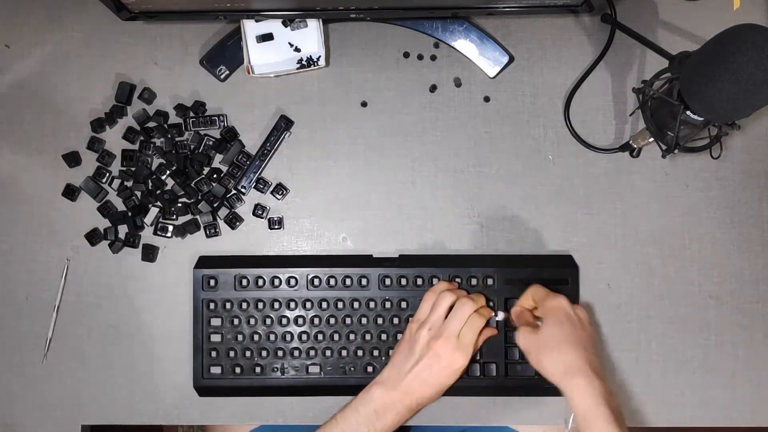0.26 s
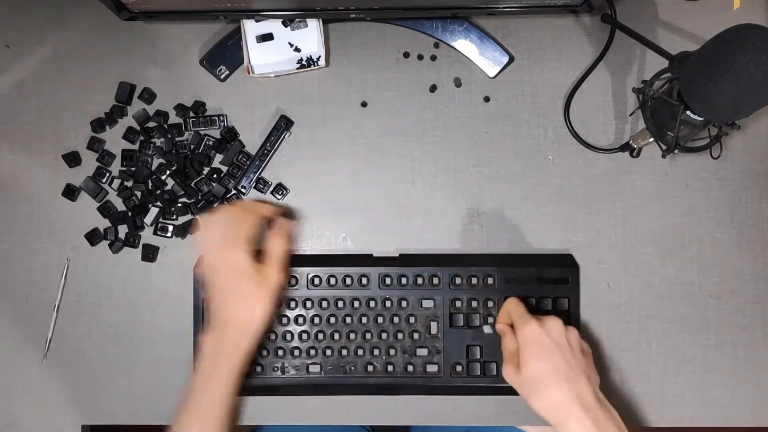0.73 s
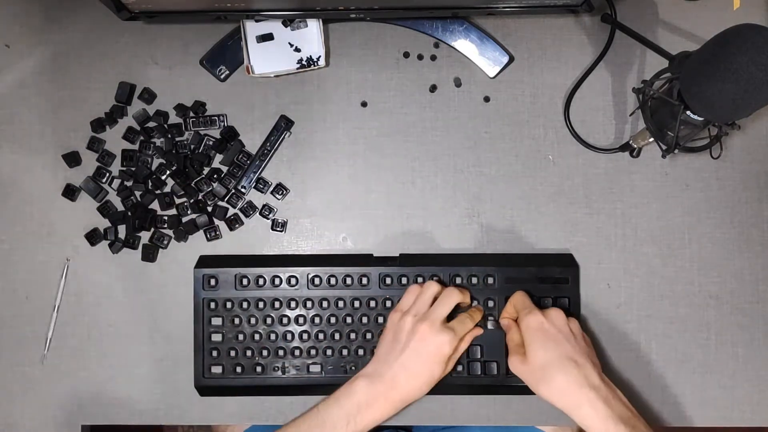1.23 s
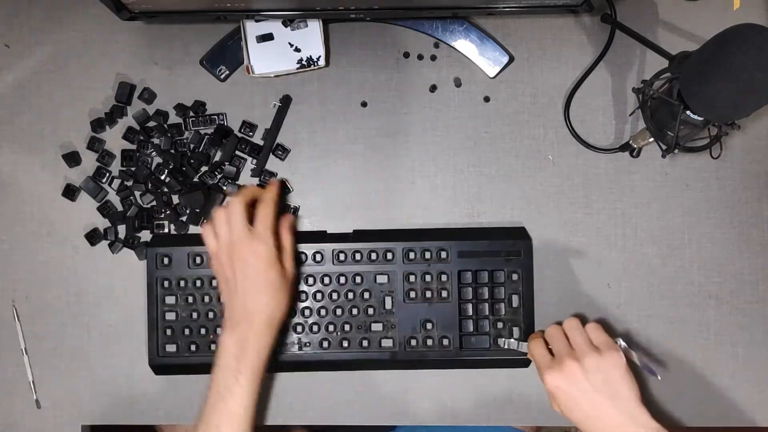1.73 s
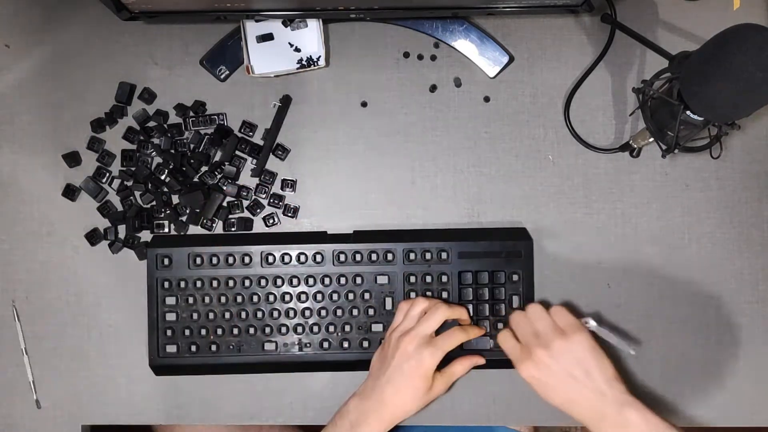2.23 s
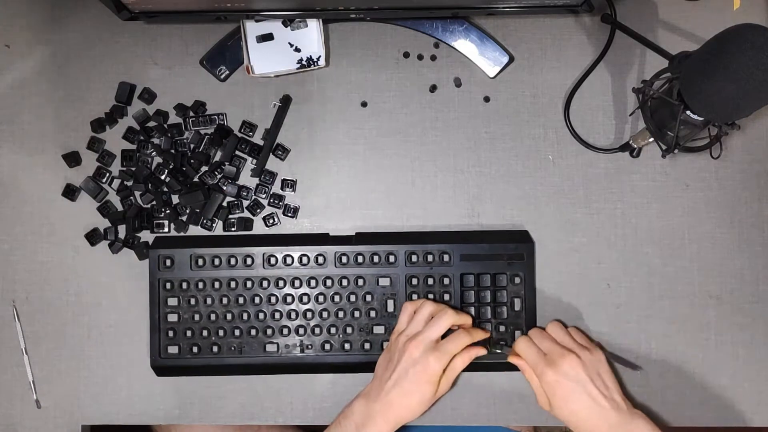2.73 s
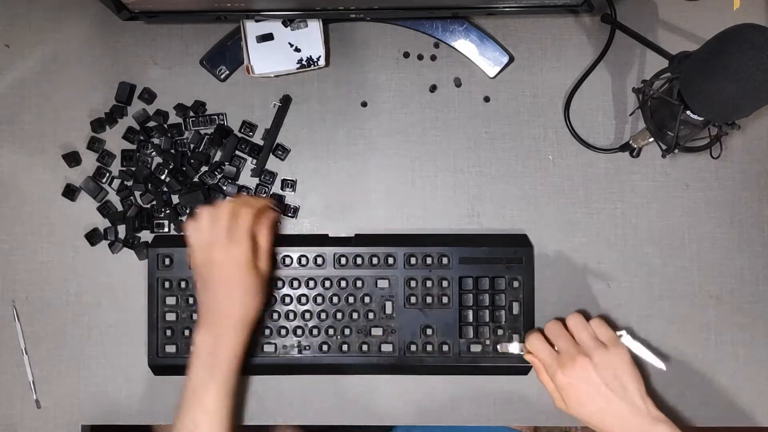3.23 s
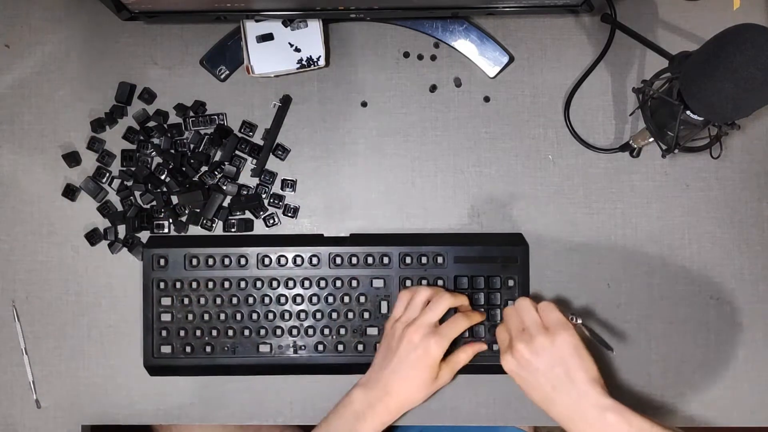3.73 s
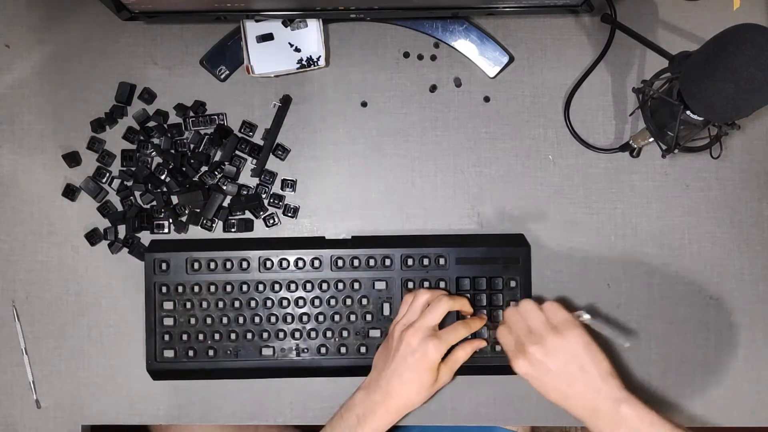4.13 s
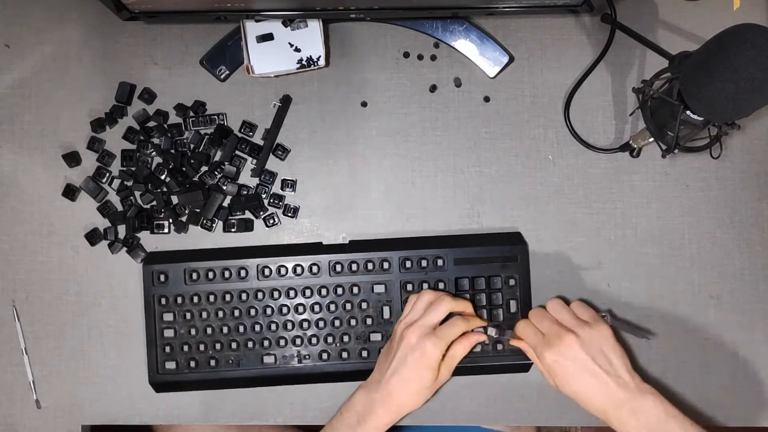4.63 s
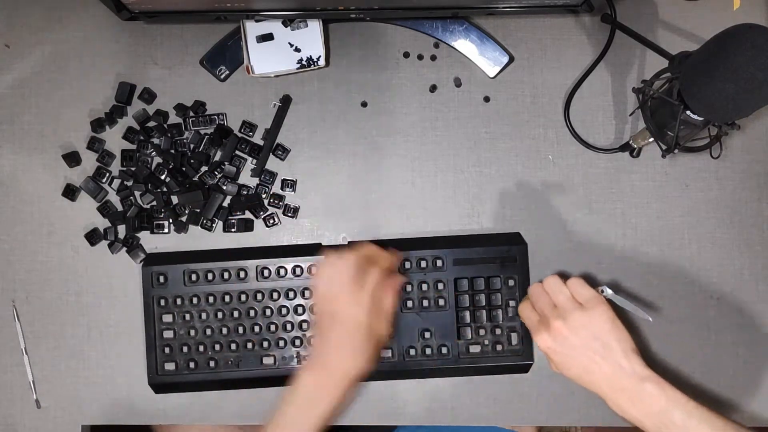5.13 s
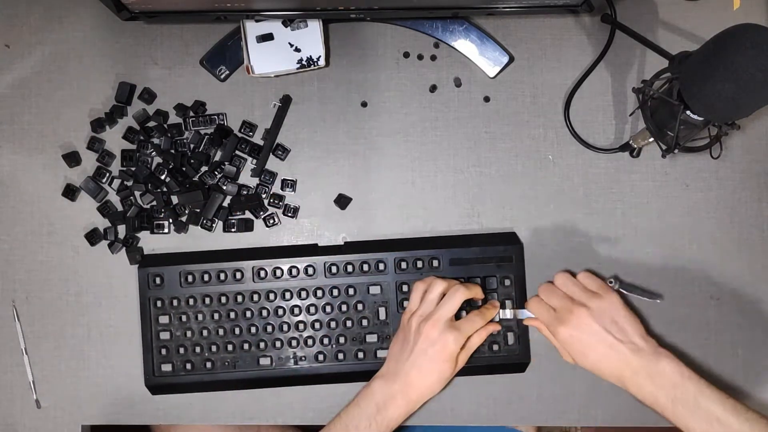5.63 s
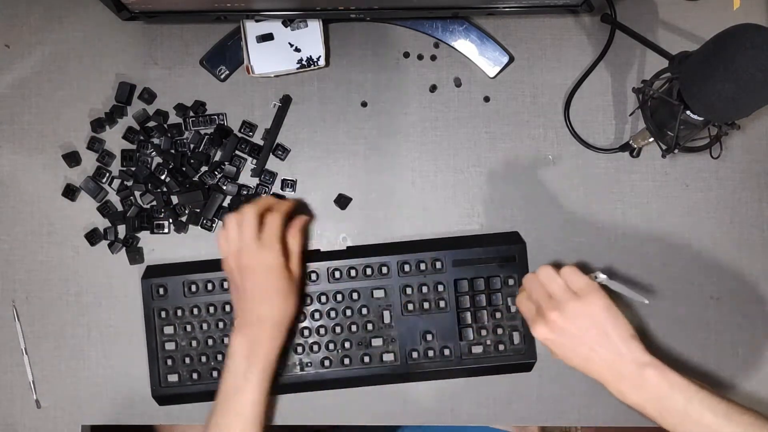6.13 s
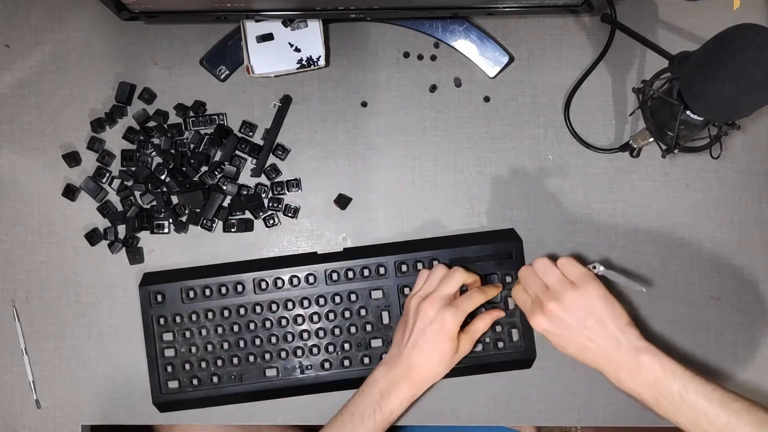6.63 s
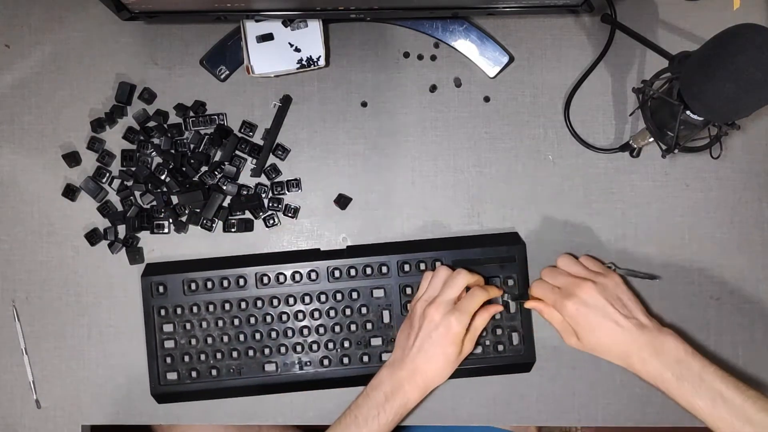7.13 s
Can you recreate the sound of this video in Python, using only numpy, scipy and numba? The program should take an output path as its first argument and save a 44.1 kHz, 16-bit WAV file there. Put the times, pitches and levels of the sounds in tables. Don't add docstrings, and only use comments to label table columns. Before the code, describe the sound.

Close overhead stereo capture in a small room: a tool levers keycaps off a keyboard with dry, stuttering plastic clicks and sharp snaps. Between pulls, caps clatter onto a heap in short bright bursts of ticks. Fingers scuff the case, soft low thumps go through the desk, and a brief bright echo follows over very faint hiss.

```python
import sys
import numpy as np
from scipy import signal
from scipy.fft import rfft, irfft, next_fast_len
from scipy.io import wavfile
from scipy.ndimage import uniform_filter1d
from numba import njit

SR = 44100
rng = np.random.default_rng(int(sys.argv[2]) if len(sys.argv) > 2 else 0)


def volts_from_db(level):
    exponent = np.asarray(level, float) / 20
    return 10 ** exponent


def dump(signal):
    limited = np.clip(np.atleast_2d(signal).T, -1, 1)
    pcm = np.round(limited * 32767).astype(np.int16)
    wavfile.write(sys.argv[1], SR, pcm)


N = 325017
M = next_fast_len(N)

# f/Hz, level/dB, t60/s
CASE_MODES = [(1100, 3.5, 0.016), (1370, -5, 0.084), (1510, 10.5, 0.0075), (1780, -3.5, 0.024),
              (2060, 12, 0.0085), (2260, -9.5, 0.004), (2525, 16.5, 0.0046)]
# f/Hz, level/dB, t60/s
CAP_WALL_MODES = [(3024, -22, 0.017), (3160, 15, 0.0022), (3590, 5.5, 0.028), (4246, 12.5, 0.0071),
                  (5054, 10, 0.012)]
# f/Hz, level/dB, t60/s
CAP_SHELL_MODES = [(5550, 5, 0.0085), (6536, 9, 0.012), (7360, 6.5, 0.022), (7890, 13, 0.0073),
                   (9680, 10, 0.0036), (9960, 1, 0.028), (12600, -22, 0.0015), (11530, 11, 0.0052),
                   (15200, 6.5, 0.0036)]
# f/Hz, level/dB, t60/s
BOARD_MODES = [(335, -7.5, 0.006), (505, -15.5, 0.25), (504, -4.5, 0.06), (677, 0.5, 0.046),
               (742, 0.5, 0.02), (900, -15.5, 0.0083)]
# f/Hz, level/dB, t60/s
DESK_LOW_MODES = [(29.2, -13.5, 0.6), (45.55, -14, 0.93), (67.1, -13, 0.44), (99.7, -2, 0.58),
                  (124.3, -5, 0.26), (162.7, -5.5, 0.24), (192, -10.5, 0.23)]
# f/Hz, level/dB, t60/s
DESK_TOP_MODES = [(251, -10.5, 0.069), (271.2, 0, 0.16), (291, -7.5, 0.13), (377, -18, 0.027),
                  (461, -8, 0.09), (540, -7.5, 0.059)]
# f/Hz, t60/s
ROOM_DECAY = [(100, 1), (400, 0.43), (1100, 0.3), (3000, 0.3), (7700, 0.26), (14000, 0.21)]
# f/Hz, level/dB
HISS_COLOUR = [(180, -36.5), (300, -42), (448, -14), (560, -1), (823, -19), (4700, -11), (7630, -6),
               (13800, -13)]
# f/Hz, left minus right/dB
PORT_BALANCE = [(100, 0), (1000, -0.5), (2500, 0), (5000, -1.5), (8000, -7), (12000, 6.5)]
# f/Hz, likeness/0-1
PORT_LIKENESS = [(30, .95), (95, 1), (160, 0.52), (290, 0.88), (640, 0.42), (1400, 0.04), (3100, 0.24),
                 (7000, 0)]
# mean delay t/s, level/dB
REBOUNDS = [
    (0, -3.5),
    (.002, 1),
    (.006, -6),
    (.011, -7),
    (.018, -13),
]
# t/s, peak level/dB, upper desk modes/dB, push length/s
PUSHES = [(0.108, -21, -30, 0.014), (0.342, -19.5, -25, 0.025), (0.63, -23, -43, 0.029),
          (1.318, -21, -31, 0.0058), (1.586, -24.5, -35, 0.012), (1.666, -24.5, -32, 0.023),
          (2.021, -47, -6, 0.0069), (2.154, -24.5, -14.5, 0.012), (2.391, -28, -15, 0.025),
          (2.616, -16, -13, 0.029), (2.799, -16, -19.5, 0.012), (3.031, -16.5, -15, 0.084),
          (3.843, -15, -16.5, 0.016), (3.901, -13.5, -21.5, 0.018), (4.06, -29.5, -9, 0.0099),
          (3.854, -34.5, -1, .006), (4.271, -31, -22, 0.011), (4.451, -36, -19, 0.023),
          (4.606, -26, -10, 0.0034), (4.778, -36.5, -7, 0.0051), (5.339, -26.5, -19, 0.01),
          (5.466, -46, 4.5, 0.0045), (5.784, -37, 0.5, 0.0054), (6.382, -23.5, -15, 0.029),
          (6.582, -33.5, -16.5, 0.0054), (6.782, -26, -19, 0.0047), (7.084, -31, -42, 0.01),
          (7.251, -23.5, -17.5, 0.067)]
# t/s, case peak level/dB, cap shell/dB, knock/dB, own ring f/Hz
SNAPS = [(0.3377, -17.5, 7.5, -32, 1500), (2.0005, -17, -1, -13, 2037), (2.803, -11.5, 4, -15.5, 1730),
         (3.9094, -18.5, -28, -15, 1830), (5.2176, -19, 11, -13, 3860), (5.3091, -22, -26, -25, 1120),
         (5.3715, -25, 1, -31, 4580), (5.5213, -24, 3, -34, 1780), (5.6759, -12.5, 1, -40, 2170),
         (5.9879, -34, -5, -14, 2260), (7.3231, -14.5, 1.5, -42, 3900)]
# t/s, case peak level/dB, cap shell/dB, knock/dB, own ring f/Hz
PRIES = [(0.0808, -33, -5, -14, 1510), (0.0943, -14, -7, -11, 1760), (0.1822, -21, -4.5, -13.5, 1520),
         (0.2106, -24.5, -24, -23, 1080), (0.3304, -17, -6.5, -15.5, 1470), (0.5872, -28, -5.5, -22, 1660),
         (1.3188, -19, 0, -8.5, 1390), (2.141, -23, -15.5, -17.5, 3080), (2.6086, -28, -7, -12, 1750),
         (2.6119, -18, -2, -11, 1470), (3.018, -25, -9, -4, 1510), (3.7795, -35.5, 17, -28, 2600),
         (4.005, -23, -3.5, -20, 4600), (4.0498, -20, 3.5, -17, 2000), (4.281, -23.5, -3.5, -30, 1050),
         (4.4652, -27.5, 2, -44, 1370), (4.5996, -14.5, 5, -12, 1750), (4.9892, -17.5, 5, -10, 2260),
         (5.763, -16.5, 1, -19.5, 1770), (6.32, -25.5, -0.5, -19, 1475), (6.538, -25, 7.5, -24, 4410),
         (6.551, -28.5, 0, -11, 2220), (6.6686, -23.5, -4.5, -15.5, 2130), (6.768, -19, 6.5, -12, 1940),
         (5.782, -31.5, 19.5, -6, 2040)]
# t/s, case peak level/dB, cap shell/dB, own ring f/Hz
TOUCHES = [(0.4848, -39.5, -12, 1570), (0.622, -51, -38, 1100), (0.74, -55, -34.5, 1100),
           (0.5453, -34.5, -6, 1630), (1.5497, -43, -15, 2060), (1.572, -44.5, 8.5, 1870),
           (1.6312, -47, -20, 2600), (2.356, -38, -22, 1360), (2.3976, -34, 0.5, 1420),
           (2.4527, -31.5, -6.5, 1560), (2.8705, -49, -3.5, 2580), (3.409, -53, 14.5, 2060),
           (3.7359, -31, -27, 1750), (3.8282, -23, -4, 1490), (4.0891, -32.5, -7, 2780),
           (4.2534, -33, -7.5, 1780), (4.782, -31, -24.5, 1960), (5.4943, -31, -5, 2260),
           (7.018, -47, 9, 2760), (7.138, -37.5, 1, 1910), (7.148, -41, 2, 1750), (7.254, -40, -12, 1660),
           (7.2732, -40, -27.5, 1760)]
# start t/s, length/s, heap rattle level/dB, case scuff level/dB
HANDLING_BURSTS = [(0.0, 0.44, -55, -60), (0.085, 0.026, -46, -58), (0.918, 0.19, -32.5, -39),
                   (1.126, 0.083, -36.5, -43), (1.763, .04, -45.5, -74), (1.792, 0.24, -37.5, -41),
                   (2.2, 1, -81, -52.5), (2.827, 0.039, -38, -41), (3.487, 0.2, -42.5, -39),
                   (3.745, .07, -65, -43), (3.816, 0.038, -30, -28.5), (4.24, 0.58, -55, -47),
                   (5.134, 0.5, -39.5, -39), (5.922, 0.063, -50, -47.5), (6.407, 0.079, -44.5, -45),
                   (6.54, 0.058, -34.5, -40), (6.637, 0.021, -39, -42), (6.91, 0.52, -81, -56.5)]
# t/s, level/dB
HAND_WEIGHT = [(0, -35.5), (.26, -34.5), (.5, -45), (1.2, -45), (1.502, -39.5), (1.9, -39), (2.05, -41.5),
               (2.85, -40.5), (3.472, -43.5), (3.96, -33.5), (4.1, -39), (4.9, -40), (5.05, -49.5),
               (5.799, -35.5), (6.1, -48), (6.4, -42.5), (6.7, -42.5), (7.37, -45)]
# t/s, shell peak level/dB, case/dB, left minus right/dB, thrown to walls/dB
DROPS = [(0.9043, -16, -11, -6, 4), (0.9148, -17, -28, -8, -2), (0.9248, -9, -14, 5, -2),
         (0.9597, -20.5, 1, -9, 1), (0.9866, -18, -14.5, -14, 4), (1.0265, -14, -7, -7, -2),
         (1.1293, -18.5, 0, 7, -2), (1.1542, -15.5, -4, -3, 1.5), (1.2031, -16.5, -23, -10.5, -3),
         (1.7933, -14, -11, -6, -3), (1.8392, -24, -12, -16, 5), (1.8866, -22.5, -9.5, -17, 0.5),
         (1.9305, -18.5, -11, 14, -4), (1.9993, -13, 0, 0, -5.5), (2.0662, -11.5, -32, -10, -11),
         (3.4783, -20, -18, -1, 0.5), (3.5865, -29, -18, 0, 1), (3.6045, -16.5, -5.5, -19.5, -3.5),
         (3.6404, -16.5, -2, -13, -6), (3.8021, -21.5, -26, -6, 2), (5.0858, -12.5, -7.5, -5, -1.5),
         (5.1212, -19, -8.5, 0, 1.5), (5.1661, -17, -4.5, -3, 3), (5.217, -11, -31, 14.5, -3),
         (5.3722, -24.5, 1, -17.5, 1), (6.3362, -14, -7.5, 3, -0.5), (6.4131, -18, -3.5, -10, -7),
         (6.4675, -19, -15, -7, -8), (6.4825, -15, -8, -8.5, -6), (6.5454, -25, 5, -8, 5)]
# t/s, shell peak level/dB
SETTLES = [(0.931, -16), (0.94, -21), (1.0095, -20.5), (1.015, -17.5), (1.048, -28), (1.106, -24),
           (1.122, -19.5), (1.18, -24), (1.2315, -30), (1.242, -20.5), (1.7783, -36), (1.7964, -13.5),
           (1.815, -33), (1.852, -29), (1.867, -21.5), (1.958, -28), (1.971, -20.5), (2.005, -17.5),
           (2.012, -18.5), (2.1171, -19.5), (2.139, -22.5), (3.473, -22), (3.4967, -28), (3.5295, -27),
           (3.5664, -30), (3.5792, -18), (3.779, -19), (5.113, -19), (5.2215, -16), (5.242, -27),
           (5.3505, -45), (5.367, -25), (5.374, -20.5), (5.403, -21), (5.413, -22), (5.4872, -24.5),
           (5.5017, -24.5), (5.523, -32), (5.5802, -24.5), (5.648, -26.5), (6.317, -29.5), (6.3349, -16),
           (6.346, -25), (6.358, -20), (6.447, -23.5), (6.513, -24.5), (6.53, -23.5), (6.553, -22),
           (6.571, -22), (6.667, -24), (6.6788, -21), (6.691, -30)]
# start t/s, length/s, depth/dB, closing speed/(dB/s)
STILL_MOMENTS = [
    (1.634, 0.066, -4.5, 1500),
    (3.297, 0.097, -14.5, 77),
    (4.914, 0.049, -7, 60),
    (6.201, 0.11, -10.5, 48.5),
    (0.794, 0.042, 0.5, 36),
    (7.038, .07, -3.5, 50),
]
# t/s, level/dB, f/Hz
THIN_TICK = (1.638, -29.5, 800)
# start t/s, length/s, f/Hz, level/dB
TOOL_SQUEAK = (-0.1, .1, 2622, -62)

SNAP_CLEAN, PRY_CLEAN, TOUCH_CLEAN = 3.1, 1.15, 1
TOUCH_KNOCK_DB, KNOCK_PER_SHELL = -31.5, -1.16
SNAP_TO_WALLS_DB, SNAP_RING_DB, LIGHT_RING_DB_PER_DB = -1.5, 1.5, 0.12
CRACK_S = 0.001
RING_TO_ROOM_DB = -18
THIN_BELOW_HZ = 750
BOARD_PAN_DB, HEAP_PAN_DB = -2, -7.5
CAP_RING_HZ, CAP_RING_SPREAD = 7700, 0.11
SETTLE_CASE_DB, SETTLE_TO_WALLS_DB = -3, -2.5
RATTLE_PER_S, SCUFF_PER_S = 400, 1100
RISE_DB_PER_S, RATTLE_FALL_DB_PER_S, SCUFF_FALL_DB_PER_S = 700, 160, 131
JUDDER_S = 0.038
AIR_DB, WET_DB, HUSH_OUT_DB_PER_S = -55.5, 12, 300
DUCK_DB, DUCK_RATIO, ATTACK_S, RELEASE_S = -31, 1.101, 0.0016, 0.13
EDGE_HZ, EDGE_DB, TOP_HZ, LOW_HZ = 14500, -20, 15700, 35.4


def on_hz(table, n):
    hz, value = np.transpose(table)
    bins_hz = np.arange(n // 2 + 1) * SR / n
    return np.interp(np.log(bins_hz + 1), np.log(hz), value)


def unit(x):
    return x / np.sqrt(np.mean(x ** 2))


def walk(per_s):
    k = int(SR / per_s)
    held = np.repeat(rng.standard_normal(N // k + 1), k)
    return uniform_filter1d(uniform_filter1d(held, k), k)[:N]


def away_db(start, length, before, after):
    t = np.arange(N) / SR
    return -before * np.maximum(start - t, 0) - after * np.maximum(t - start - length, 0)


def pair(mid, side):
    n = next_fast_len(len(mid))
    alike = np.clip(on_hz(PORT_LIKENESS, n), 0, 1)
    m = rfft(mid, n) * np.sqrt((1 + alike) / 2)
    s = rfft(side, n) * np.sqrt((1 - alike) / 2)
    return irfft(np.array([m + s, m - s]), n)[:, :len(mid)]


def add(out, s, x, pan_db):
    i = int(s * SR)
    x = x[..., :N - i]
    out[..., i:i + x.shape[-1]] += x * volts_from_db(np.array([[pan_db], [-pan_db]]) / 2)


def ring(modes, seconds, chance, spread=0.076, scatter_db=2.0):
    t = np.arange(int(seconds * SR)) / SR
    hz, db, t60 = np.transpose(modes)[:, :, None]
    detune, strength, phase = chance[:3 * len(modes)].reshape(3, -1, 1)
    tones = np.sin(2 * np.pi * hz * (1 + spread * detune) * t + 2.22 * phase)
    x = np.sum(volts_from_db(db + scatter_db * strength) * tones * 1000. ** (-t / t60), axis=0)
    x = x * np.minimum(t / 0.0002, 1)
    return x / np.abs(x).max()


def squeak():
    s, length, hz, db = TOOL_SQUEAK
    phase = 2 * np.pi * np.cumsum(hz * (1 + 0.0048 * walk(40))) / SR
    return volts_from_db(db + away_db(s, length, 300., 200.)) * np.sin(phase)


def air():
    colour = volts_from_db(on_hz(HISS_COLOUR, M))
    mid, side = (irfft(rfft(rng.standard_normal(M)) * colour, M)[:N] for _ in range(2))
    return volts_from_db(AIR_DB + 2.1 * walk(11)) * unit(pair(mid, side))


def desk_hum():
    tone = ring(DESK_LOW_MODES, .5, np.zeros(30)) + volts_from_db(-19.5) * ring(DESK_TOP_MODES, .5, np.zeros(18))
    mid, side = (signal.fftconvolve(rng.standard_normal(N), tone)[:N] for _ in range(2))
    shake_db = np.interp(np.arange(N) / SR, *np.transpose(HAND_WEIGHT))
    return volts_from_db(shake_db + 0.5 + 2.0 * walk(6)) * unit(pair(mid, side))


def grains(modes, per_s, spread_db, count):
    out = np.zeros((2, N))
    for _ in range(count):
        happens = rng.random(N) < per_s / count / SR
        ticks = happens * volts_from_db(spread_db * rng.standard_normal(N))
        for side in out:
            piece = ring(modes, 0.009, rng.standard_normal(60), spread=0.087)
            side += signal.oaconvolve(ticks, piece)[:N]
    return unit(out)


def handling():
    rattle_db = np.max([db + away_db(s, length, RISE_DB_PER_S, RATTLE_FALL_DB_PER_S)
                        for s, length, db, _ in HANDLING_BURSTS], axis=0)
    scuff_db = np.max([db + away_db(s, length, RISE_DB_PER_S, SCUFF_FALL_DB_PER_S)
                       for s, length, _, db in HANDLING_BURSTS], axis=0)
    heap = volts_from_db(rattle_db - 1.0) * grains(CAP_WALL_MODES[1:] + CAP_SHELL_MODES, RATTLE_PER_S, 1, 10)
    scuff = volts_from_db(scuff_db - 5.5) * grains(CASE_MODES[2:] + CAP_WALL_MODES[:2], SCUFF_PER_S, 4.0, 10)
    press_db = 1.35 * (scuff_db + 39.0) - 46.0
    press = volts_from_db(press_db) * grains(BOARD_MODES + CASE_MODES[:2], SCUFF_PER_S, 6.0, 3)
    return heap + scuff + press


def room(dry):
    n = int(.6 * SR)
    t = np.arange(n) / SR
    centres = 60 * 2 ** np.arange(0, 8.5, .5)
    noise = rfft(pair(*rng.standard_normal((2, n))))
    bins_hz = np.arange(n // 2 + 1) * SR / n
    octaves = np.log2((bins_hz + 1)[None] / centres[:, None])
    hz, seconds = np.transpose(ROOM_DECAY)
    t60 = np.interp(np.log(centres), np.log(hz), seconds)
    tail = np.zeros((2, n))
    for octave, decay_s in zip(octaves, t60):
        band = irfft(noise * np.clip(1 - 2 * abs(octave), 0, 1), n)
        tail += band * 1000. ** (-t / decay_s)
    tail = tail * np.clip((t - .002) / 0.0011, 0, 1)
    tail = tail / np.sqrt(np.sum(tail ** 2) / 2)
    return volts_from_db(WET_DB) * signal.fftconvolve(dry.mean(axis=0)[None], tail)[:, :N]


def blow(parts, own, chance):
    starts = np.cumsum([0] + [3 * len(modes) for modes, _ in parts])
    views = (chance[0], 0.76 * chance[0] + 0.66 * chance[1])
    each = np.array([[volts_from_db(db) * ring(modes, .02, v[k:], scatter_db=1.8) for v in views]
                     for (modes, db), k in zip(parts, starts)])
    crack = each * np.exp(-np.arange(each.shape[-1]) / SR / CRACK_S)
    small = np.array([modes is not BOARD_MODES for modes, _ in parts])
    thin = signal.butter(2, THIN_BELOW_HZ, "high", fs=SR, output="sos")
    crack[small] = signal.sosfilt(thin, crack[small])
    narrow = np.array([ring([own], .02, v[-6:], spread=0.0083) for v in views])
    near = each.sum(axis=0) + volts_from_db(own[1]) * narrow
    far = crack.sum(axis=0) + volts_from_db(own[1] + RING_TO_ROOM_DB) * narrow
    return np.array([near, far])


def contacts():
    hits = [(*row, SNAP_CLEAN) for row in SNAPS] + [(*row, PRY_CLEAN) for row in PRIES]
    hits += [(s, db, shell_db, TOUCH_KNOCK_DB + KNOCK_PER_SHELL * shell_db, hz, TOUCH_CLEAN)
             for s, db, shell_db, hz in TOUCHES]
    out, chance = np.zeros((2, 2, N)), rng.standard_normal((len(hits), len(REBOUNDS), 2, 100))
    for (s, db, shell_db, knock_db, hz, clean), draws in zip(hits, chance):
        high = np.clip((hz - 2000) / 1500, 0, 1)
        case = [(f, g - 8.1 * (1 - high) * abs(np.log2(f / hz)), t60) for f, g, t60 in CASE_MODES]
        parts = [(case, -7.0 * high), (CAP_WALL_MODES, 0.52 * shell_db * (1 - high)),
                 (CAP_SHELL_MODES, shell_db), (BOARD_MODES, knock_db + 3.0)]
        own_db = SNAP_RING_DB * (clean - 1) + 0.3 + LIGHT_RING_DB_PER_DB * (-31.5 - db)
        to_walls = volts_from_db(np.array([0, SNAP_TO_WALLS_DB * (clean - 1)]))[:, None, None]
        force_db = 1.26 * (db + 32) - 33.0
        for (lag_s, lag_db), d in zip(REBOUNDS, draws):
            size = volts_from_db(force_db + lag_db - 1260 * (clean - 1) * lag_s + 0.83 * d[0, -2])
            when = s - .0005 + lag_s * np.exp(.25 * d[0, -1])
            add(out, when, size * blow(parts, (hz, own_db, .018), d) * to_walls, BOARD_PAN_DB)
    return out


def desk_thumps():
    n = int(.15 * SR)
    out, chance = np.zeros((2, N)), rng.standard_normal((len(PUSHES), 60 + 2 * n))
    for (s, db, top_db, push_s), d in zip(PUSHES, chance):
        judder = pair(*d[60:].reshape(2, n)) * np.exp(-np.arange(n) / SR / JUDDER_S)
        top = ring(DESK_TOP_MODES, .5, d[30:], spread=0.02, scatter_db=1.0)
        top = signal.fftconvolve(top[None], judder)[:, :int(.5 * SR)]
        low = ring(DESK_LOW_MODES, .5, d, spread=0.018, scatter_db=1.5)
        body = low + volts_from_db(top_db + 12.0) * top / np.abs(top).max()
        rise = np.minimum(np.arange(body.shape[1]) / SR / max(push_s, 1e-3), 1)
        add(out, s - .005, volts_from_db(db - 0.5) * body * rise, 0)
    return out


def hush():
    return volts_from_db(sum(np.minimum(db - away_db(s, length, speed, HUSH_OUT_DB_PER_S), 0)
                   for s, length, db, speed in STILL_MOMENTS))


def landings():
    rows = DROPS + [(s, db, SETTLE_CASE_DB, HEAP_PAN_DB, SETTLE_TO_WALLS_DB) for s, db in SETTLES]
    out, chance = np.zeros((2, 2, N)), rng.standard_normal((len(rows), 2, 2, 100))
    for (s, db, case_db, pan_db, walls_db), draws in zip(rows, chance):
        hz = CAP_RING_HZ * np.exp(CAP_RING_SPREAD * draws[0, 0, -8])
        parts = [(CAP_SHELL_MODES, 0), (CASE_MODES + CAP_WALL_MODES, case_db)]
        for lag_s, lag_db, d in zip((0, .0015), (0.5, -3), draws):
            size = volts_from_db(1.25 * (db + 30.5) - 33.5 + lag_db)
            near, far = size * blow(parts, (hz, -4.0, .008), d)
            add(out, s + lag_s, np.array([near, volts_from_db(walls_db) * far]), pan_db)
    return out


def click():
    s, db, hz = THIN_TICK
    out, t = np.zeros((2, N)), np.arange(200) / SR
    add(out, s, volts_from_db(db) * np.exp(-2 * np.pi * hz * t), 0)
    return out


def scene():
    (snaps, snaps_wide), (ticks, ticks_wide) = contacts(), landings()
    hands = handling()
    echoes = room(snaps_wide) + room(volts_from_db(1.0) * ticks_wide + volts_from_db(-9.0) * hands)
    background = hush() * (echoes + air())
    return snaps + ticks + hands + background + desk_thumps() + desk_hum() + click() + squeak()


@njit
def follow(x, attack, release):
    y, e = np.empty(len(x)), 0.
    for i in range(len(x)):
        e += (x[i] - e) * (attack if x[i] > e else release)
        y[i] = e
    return y


def low_pass(x):
    return signal.sosfilt(signal.butter(12, 16790, fs=SR, output="sos"), x)


def record(dry):
    tilt = on_hz(PORT_BALANCE, M) / 2
    x = irfft(rfft(dry, M) * volts_from_db(np.array([tilt, -tilt])), M)[:, :N]
    level = follow(np.abs(x).max(axis=0), 1 / (ATTACK_S * SR), 1 / (RELEASE_S * SR))
    level = np.roll(level, -int(0.0016 * SR))
    edge = signal.sosfiltfilt(signal.cheby1(6, .1, EDGE_HZ, "high", fs=SR, output="sos"), x)
    x = x - edge * (1 - np.clip(level / volts_from_db(EDGE_DB) - 1, 0, 1))
    x = x * np.minimum(volts_from_db(DUCK_DB) / (level + 1e-9), 1) ** (1 - 1 / max(DUCK_RATIO, 1))
    x = np.tanh(1.697 * x) / 1.494
    x = signal.sosfilt(signal.ellip(8, .2, 60, TOP_HZ, fs=SR, output="sos"), x)
    x = signal.sosfilt(signal.butter(2, LOW_HZ, "high", fs=SR, output="sos"), x)
    return low_pass(x)


dry = scene()
out = record(dry)
dump(out)
```